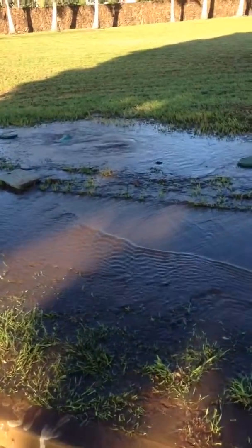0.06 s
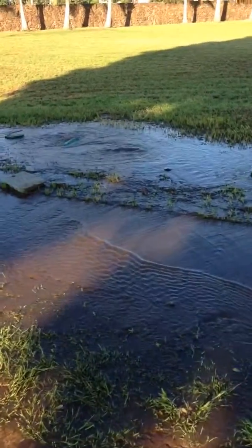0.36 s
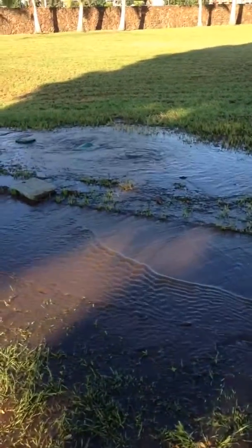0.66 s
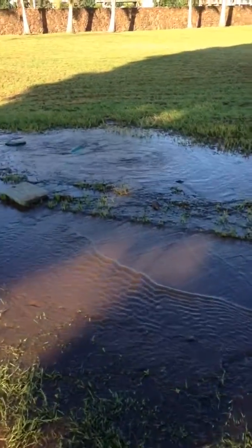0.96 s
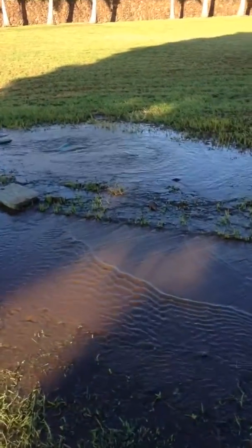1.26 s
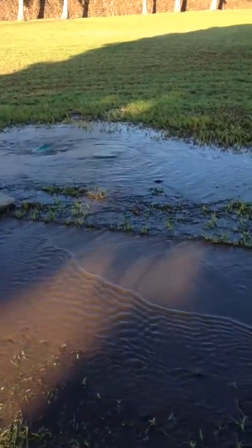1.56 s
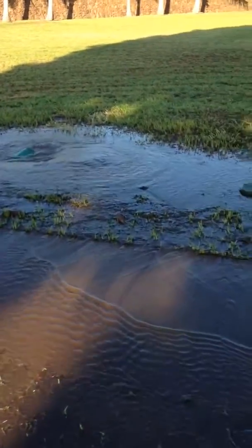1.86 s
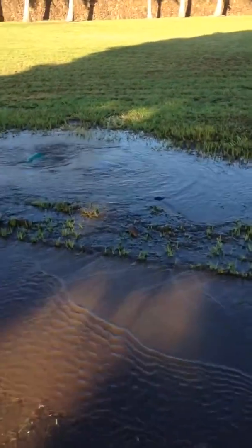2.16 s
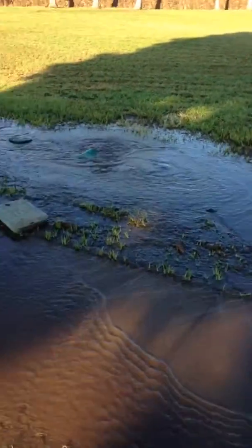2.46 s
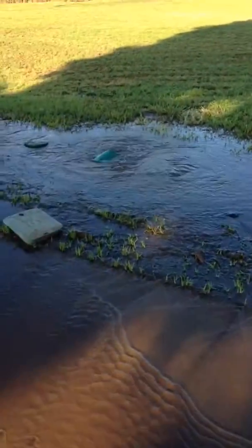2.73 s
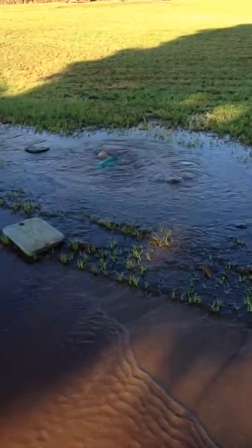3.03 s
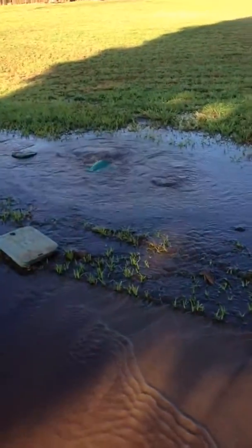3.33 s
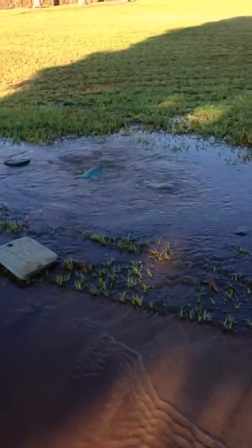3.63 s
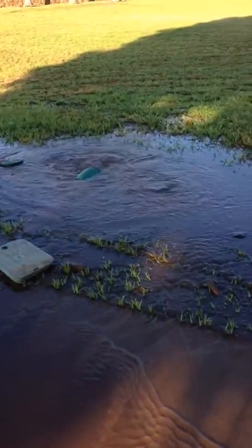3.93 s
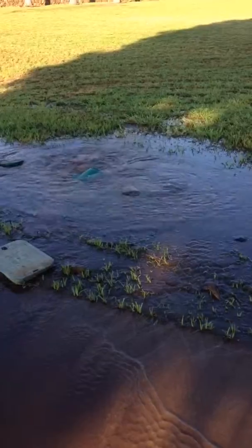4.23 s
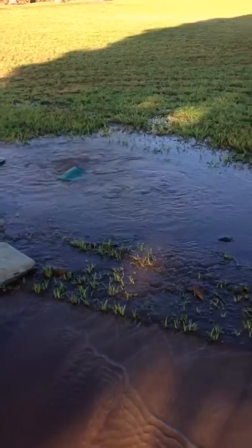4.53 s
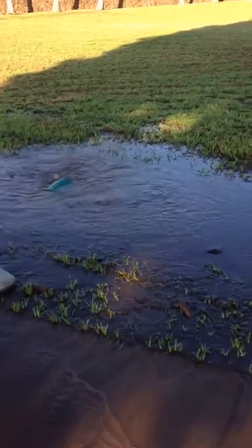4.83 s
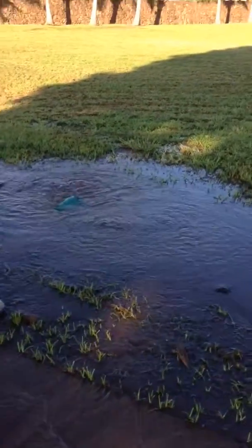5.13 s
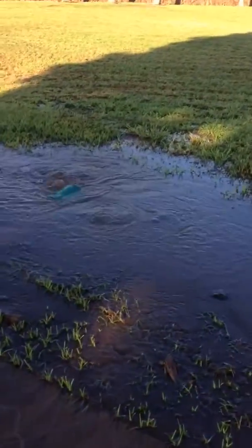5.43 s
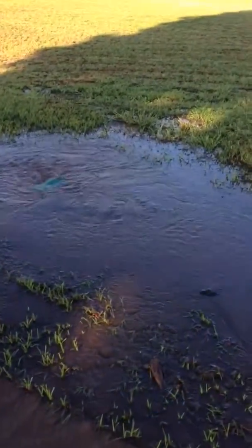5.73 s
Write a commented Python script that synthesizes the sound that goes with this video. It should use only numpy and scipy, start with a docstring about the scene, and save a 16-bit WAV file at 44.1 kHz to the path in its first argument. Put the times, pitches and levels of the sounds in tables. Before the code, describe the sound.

Water trickles softly through a flooded lawn under low traffic rumble, with distant engine revs, soft steps and two faint bird peeps.

```python
"""A lawn flooded by a leak. From the start, tiny bubbles trickle through the grass over distant traffic;
wet blades crackle under slow, soft steps and water films tick as they break.
From 1.3 s to 3.7 s a far engine revs three times, while a hand bumps the camera and two stalks snap.
A small bird peeps at 4 s and 4.5 s, more bumps follow, and a drop falls into the pool at 5.1 s.
The trickle fades and a last stalk snaps at 5.7 s."""
import sys
import numpy as np
from scipy import signal
from scipy.fft import rfft, irfft
from scipy.io import wavfile
from scipy.ndimage import uniform_filter1d

SR = 44100
rng = np.random.default_rng(int(sys.argv[2]) if len(sys.argv) > 2 else 0)


def master(y):
    """Save y as 16-bit WAV."""
    cut = np.clip(np.atleast_2d(y).T, -1, 1)
    pcm = np.round(cut * 32767)  # scale
    wavfile.write(sys.argv[1], SR, pcm.astype(np.int16))


N = 255339
TIME = np.arange(N) / SR
BAND_LIMIT_HZ = 15450


def gain_of(db):
    """Decibels to amplitude."""
    return 10 ** (np.asarray(db) / 20)


def unit_rms(x):
    """Scale to rms 1."""
    return x / np.sqrt(np.mean(x ** 2) + 1e-20)


def bell(x, centre, sigma):
    """Gaussian of height 1."""
    return np.exp(-.5 * ((x - centre) / sigma) ** 2)


def follow(rows):
    """Per-sample curves from rows that start with a time in seconds."""
    times_s, *columns = np.transpose(rows)
    return [np.interp(TIME, times_s, column) for column in columns]


def colour(x, spectrum, skirt_db_per_oct=30):
    """Filter by (Hz, dB) points, rolling off beyond the ends."""
    hz, db = np.transpose(spectrum)
    octave, known = np.log2(np.fft.rfftfreq(N, 1 / SR) + 1), np.log2(hz + 1)
    beyond_oct = abs(octave - np.clip(octave, known[0], known[-1]))
    return irfft(rfft(x) * gain_of(np.interp(octave, known, db) - skirt_db_per_oct * beyond_oct), N)


def drift(cutoff_hz):
    """Low-passed noise, rms 1."""
    lowpass = np.exp(-(np.fft.rfftfreq(N, 1 / SR) / cutoff_hz) ** 2)
    return unit_rms(irfft(rfft(rng.standard_normal(N)) * lowpass, N))


def clicks(per_s, spread_db):
    """Random impulses, most small, a few large."""
    size = gain_of(spread_db * np.minimum(rng.exponential(1, N), 3))
    return size * rng.choice([-1., 1.], N) * (rng.random(N) < per_s / SR)


def swells(rows):
    """Envelope with one bell per row."""
    return sum(gain_of(db) * bell(TIME, centre_s, sigma_s) for centre_s, sigma_s, db in rows)


def burst(peak_s, db, centre_hz, width_oct, rise_s, decay_s, size=4096):
    """Band of noise with exponential rise and decay."""
    out = np.zeros(N + 2 * size)
    t = (np.arange(size) - size // 4) / SR
    hz = np.fft.rfftfreq(size, 1 / SR) + 1
    band = bell(np.log2(hz / centre_hz), 0, width_oct)
    envelope = np.exp(-np.maximum(-t / rise_s, t / decay_s))
    sound = envelope * irfft(rfft(rng.standard_normal(size)) * band)
    start = max(round(peak_s * SR) - size // 4, 0)
    out[start:start + size] = gain_of(db) * sound * np.linalg.norm(envelope) / np.linalg.norm(sound)
    return out[:N]


def traffic(rumble_db=-40.5, recede_db_per_s=.3, swell_db=.8, drone_trim_db=1, waver=.28):
    """Many far engines rumble and slowly recede; the nearest drones and wavers."""
    # Each row: frequency in Hz, relative density in dB.
    spectrum = [(8, -20), (20, -15), (35, -19.5), (52, -6), (75, -2), (107, -1.5), (131, -0.5), (151, -6),
                (195, -6), (215, -11), (250, -16), (305, -21), (385, -30), (480, -36)]
    # Each row: time in seconds, firing rate in Hz, level before trim in dB.
    drone_curve = [(0, 132.3, -51), (.33, 125, -46), (1.1, 125.3, -49), (1.8, 99.34, -46.5),
                   (2.5, 107.5, -45), (2.95, 113.2, -42), (3.3, 107.8, -50), (4.5, 103.9, -47.5),
                   (5.79, 100.3, -50)]
    rumble = unit_rms(colour(rng.standard_normal(N), spectrum))
    rumble *= gain_of(rumble_db - recede_db_per_s * TIME + swell_db * drift(3.3))
    firing_hz, drone_db = follow(drone_curve)
    phase = 2 * np.pi * np.cumsum(firing_hz) / SR + waver * drift(8.8)
    drone = np.sin(phase) * (1 + waver * drift(5.3))
    return rumble + gain_of(drone_db + drone_trim_db) * unit_rms(drone)


def wash(level_db=-51.6, patch_db=1.3):
    """Tyres and running water: soft noise whose bands swell and sink independently."""
    # Each row: frequency in Hz, relative density in dB.
    spectrum = [(300, -8), (440, -7.5), (590, -4), (780, -2), (1000, 0.5), (1400, -2.5), (2000, -8),
                (2600, -12), (3300, -16), (4600, -19), (5700, -24), (8000, -27), (12200, -31), (15300, -31)]
    frames = signal.stft(colour(rng.standard_normal(N), spectrum), nperseg=512, noverlap=384)[2]
    patches = uniform_filter1d(rng.standard_normal(frames.shape), size=5, axis=0)
    patches = unit_rms(uniform_filter1d(patches, size=20, axis=1))
    hiss = signal.istft(frames * gain_of(patch_db * patches), nperseg=512, noverlap=384)[1][:N]
    mid_band = signal.sosfilt(signal.butter(4, [500, 2000], "band", fs=SR, output="sos"), hiss)
    return hiss / mid_band.std() * gain_of(level_db)


def engine(flutter=.18, half_order_db=-24):
    """Far exhaust tone: booms near the pipe resonance, flutters with air and echoes."""
    # Each row: throttle opening and hold in seconds, start and top firing rates in Hz,
    # level before resonance in dB.
    revs = [(1.26, .48, 74, 217, -41.5), (2.51, 0.19, 157, 220, -46.5), (3.475, 0.166, 157, 214, -45.5)]
    run_on_s, flywheel_s, sag_hz_per_s = .14, .056, 90
    open_s, ease_s, shut_db_per_s = .016, .015, 135
    coast_db, coast_db_per_s = -10.5, 19.5
    pipe_hz, pipe_width_hz, pipe_db = 183.7, 33, 14
    rate_curve, load = [], np.zeros(N)
    for start_s, hold_s, from_hz, top_hz, db in revs:
        rate_curve += [(start_s, from_hz), (start_s + hold_s + run_on_s, top_hz)]
        opening = np.clip((TIME - start_s) / open_s, 0, 1)
        shut_s = np.maximum(TIME - start_s - hold_s, 0)
        fade_db = np.maximum(-shut_db_per_s * shut_s, coast_db - coast_db_per_s * shut_s)
        load = np.maximum(load, opening * gain_of(db + fade_db))
    load = uniform_filter1d(load, round(ease_s * SR))
    sag_hz = sag_hz_per_s * np.maximum(TIME - rate_curve[-1][0], 0)
    firing_hz = uniform_filter1d(follow(rate_curve)[0] - sag_hz, round(flywheel_s * SR))
    boom = gain_of(pipe_db * bell(firing_hz, pipe_hz, pipe_width_hz))
    phase = 2 * np.pi * np.cumsum(firing_hz) / SR
    tone = np.sin(phase) + gain_of(half_order_db) * np.sin(phase / 2)  # uneven cylinders
    return load * boom * unit_rms(tone) * (1 + flutter * drift(41))


def bird(waver=.0066):
    """Short, thin whistles of nearly level pitch."""
    # Each row: centre and length in seconds, pitch in Hz, level in dB.
    peeps = [(4.047, 0.067, 4740, -63), (4.506, 0.073, 4716, -55)]
    warped_s = np.cumsum(1 + waver * drift(112)) / SR
    out = np.zeros(N)
    for centre_s, length_s, hz, db in peeps:
        envelope = np.cos(np.pi * np.clip((TIME - centre_s) / length_s, -.5, .5))
        out += gain_of(db) * envelope * np.sin(2 * np.pi * hz * warped_s)
    return out


def handling():
    """A hand shifts on the camera: dull, soft bumps."""
    # Each row: centre and half length in seconds, level in dB.
    bumps = [(1.28, 0.01, -33.5), (1.39, 0.068, -37), (4.37, .03, -40), (4.485, 0.01, -39),
             (5.24, 0.039, -40)]
    body_hz_db = [(60, -3), (100, 3), (140, -4.5)]
    return swells(bumps) * unit_rms(colour(rng.standard_normal(N), body_hz_db))


def rustles(per_s=2200, spread_db=4):
    """Wet blades give way underfoot in a dense crackle."""
    # Each row: centre and half length in seconds, level in dB.
    crushes = [(0.274, 0.01, -53), (1.262, 0.012, -56), (2.046, 0.024, -62.5), (2.135, 0.014, -60.5),
               (2.579, 0.02, -58.5), (2.643, 0.011, -57), (3.177, 0.029, -56), (5.12, 0.062, -57.5),
               (5.237, 0.0091, -56), (5.331, 0.0081, -55.5), (5.72, 0.0035, -44), (5.731, 0.0097, -48.5)]
    blades_hz_db = [(1300, -5), (2100, 3.5), (4200, 1), (7000, -8), (11000, -11.5), (15000, -18)]
    return swells(crushes) * unit_rms(colour(clicks(per_s, spread_db), blades_hz_db))


def snaps(knock_offset_db=-9):
    """Stalks break with a dull knock and ring in shared bands, brighter or duller."""
    # Each row: time in seconds, base level in dB, rise in seconds, tilt in dB per octave.
    breaks = [(2.342, -43, 0.00083, 5), (3.177, -44, .001, -7), (5.722, -37, 0.0025, -1.5)]
    # Each row: centre in Hz, width in octaves, offset in dB, decay in seconds.
    stalk_bands = [(2030, 0.17, 0.5, 0.0034), (4100, 0.31, -1, 0.0026), (6400, 0.62, -6.5, 0.0039),
                   (6200, 0.054, -18, 0.015)]
    out = np.zeros(N)
    for peak_s, db, rise_s, tilt_db_per_oct in breaks:
        out += burst(peak_s, db + knock_offset_db, 1000, width_oct=.57, rise_s=rise_s, decay_s=.004)
        for hz, width_oct, offset_db, decay_s in stalk_bands:
            tilt_db = tilt_db_per_oct * np.log2(hz / stalk_bands[0][0])
            out += burst(peak_s, db + offset_db + tilt_db, hz, width_oct, rise_s, decay_s)
    return out


def ticks(faint_per_s=1.5, faint_db=-61.5, faint_hz=(8000, 13500), faint_width_oct=.25):
    """Water films break, each in its own band; fainter ones fall at random."""
    # Each row: time in seconds, peak level in dB, centre in Hz, width in octaves.
    films = [(.068, -48, 3220, .1), (.126, -54, 12000, .3), (.406, -51, 7000, .8),
             (1.216, -52.5, 3484, .15), (1.246, -56, 7200, .23), (1.48, -60, 13000, .3),
             (2.441, -46.5, 3830, .3), (2.637, -49, 7000, 0.6), (2.922, -56, 7160, .39),
             (3.385, -53.5, 7930, .25), (5.315, -53, 9050, .5)]
    draws = rng.random((round(faint_per_s * N / SR), 2))
    faint = [(when * N / SR, faint_db, np.interp(pitch, [0, 1], faint_hz), faint_width_oct)
             for when, pitch in draws]
    return sum(burst(*row, rise_s=.0005, decay_s=.0016) for row in films + faint)


def plip():
    """One larger drop hits the pool and rings at a clear pitch."""
    return burst(peak_s=5.07, db=-43, centre_hz=2043, width_oct=.06, rise_s=.003, decay_s=.0066)


def trickle(per_s=1100, spread_db=4, glide=.041, pitches=32):
    """Tiny bubbles burst among the blades, each ringing a few cycles and rising in pitch."""
    # Each row: frequency in Hz, relative density in dB.
    spectrum = [(1200, -13), (2200, -5), (4000, -0.5), (6500, -6), (10000, -9), (15000, -16)]
    # Each row: time in seconds, level in dB.
    level_curve = [(0, -70.5), (.7, -71), (1.4, -67.5), (3.3, -69), (4.5, -73), (5.2, -71), (5.79, -85)]
    points_hz, points_db = np.transpose(spectrum)
    out = np.zeros(N)
    for hz in np.geomspace(points_hz[0], min(points_hz[-1], BAND_LIMIT_HZ), pitches):
        ring_cycles = 5 * rng.uniform(.38, .8)
        cycles = np.arange(0, 4 * ring_cycles, hz / SR)
        envelope = np.exp(-2 * cycles / ring_cycles) * (1 - np.exp(-2 * cycles))
        bubble = envelope * np.sin(2 * np.pi * cycles * (1 + glide * cycles / ring_cycles))
        bubbles = signal.oaconvolve(clicks(per_s / pitches, spread_db), bubble)[:N]
        out += hz * gain_of(np.interp(hz, points_hz, points_db)) * bubbles
    return unit_rms(out) * gain_of(follow(level_curve)[0])


def scene():
    """Open air: mono sum, no reverb."""
    bed = engine() + traffic() + handling() + wash() + trickle()
    return (bed + rustles() + snaps() + plip() + bird() + ticks())[None]


def record(dry):
    """Microphone port ripple, then a steep low-pass."""
    # Each row: centre and width in Hz, gain in dB.
    port_bands = [(2430, 47, 2), (2790, 270, -1)]
    hz = np.fft.rfftfreq(N, 1 / SR)
    ripple_db = sum(db * bell(hz, centre_hz, width_hz) for centre_hz, width_hz, db in port_bands)
    rippled = irfft(rfft(dry) * gain_of(ripple_db), N)
    lowpass = signal.firwin(511, BAND_LIMIT_HZ, window=("kaiser", 9), fs=SR)
    return signal.oaconvolve(rippled, lowpass[None], "same")


dry = scene()
out = record(dry)
master(out)
```